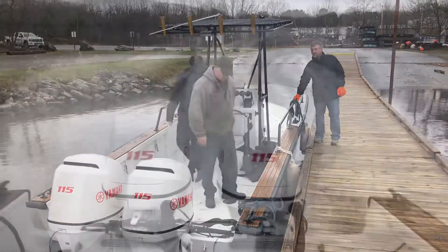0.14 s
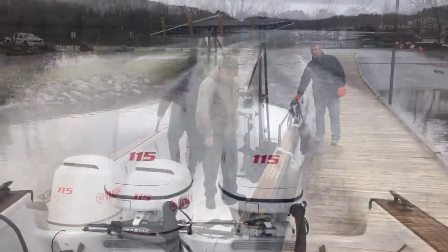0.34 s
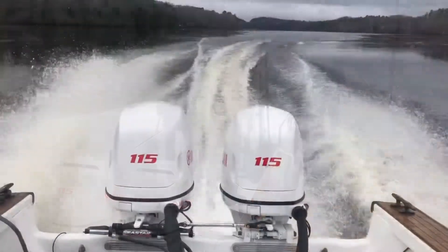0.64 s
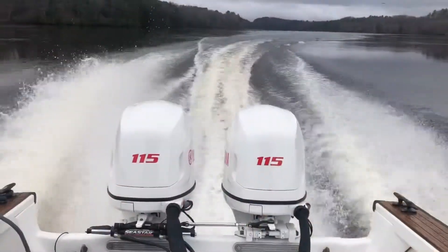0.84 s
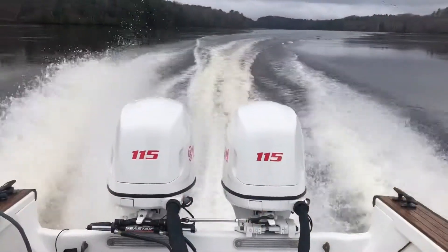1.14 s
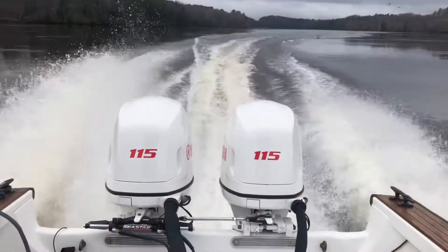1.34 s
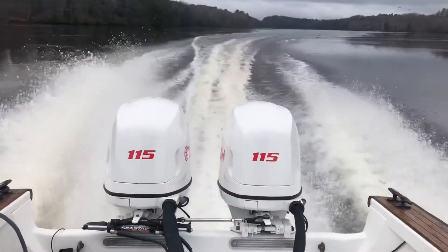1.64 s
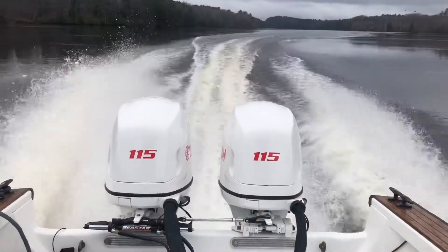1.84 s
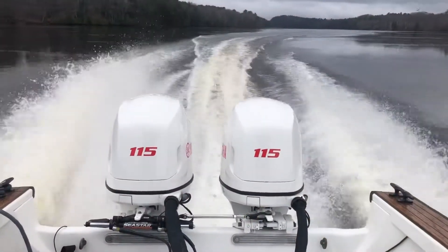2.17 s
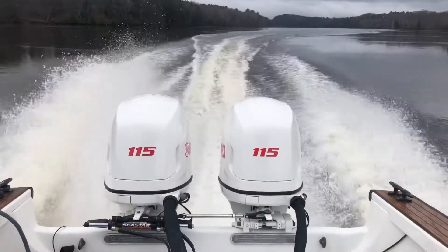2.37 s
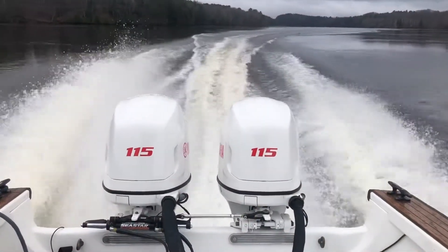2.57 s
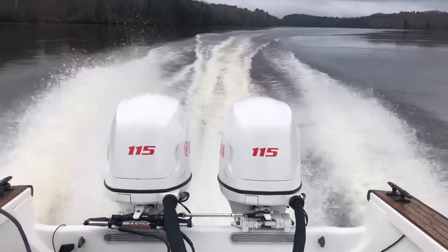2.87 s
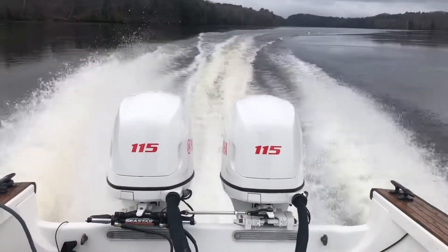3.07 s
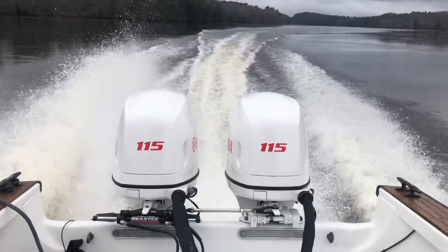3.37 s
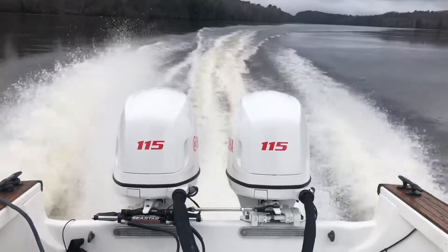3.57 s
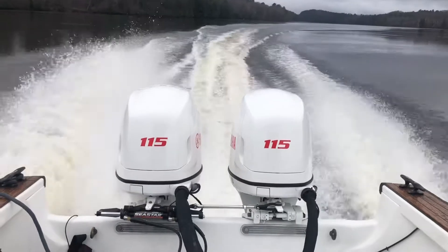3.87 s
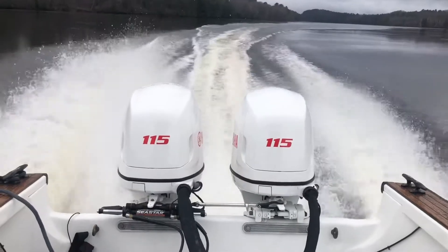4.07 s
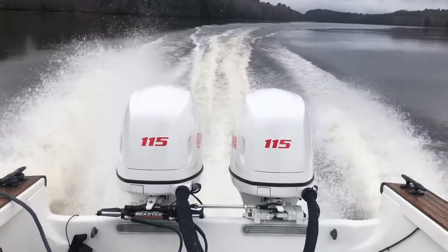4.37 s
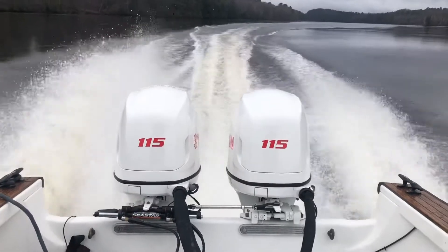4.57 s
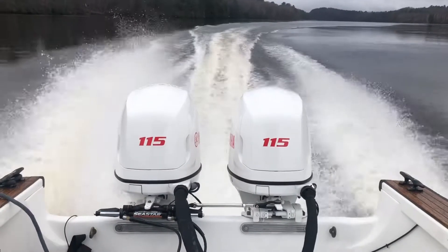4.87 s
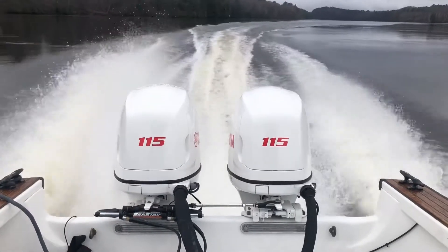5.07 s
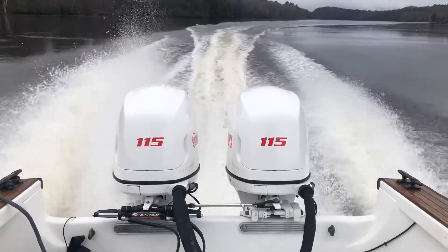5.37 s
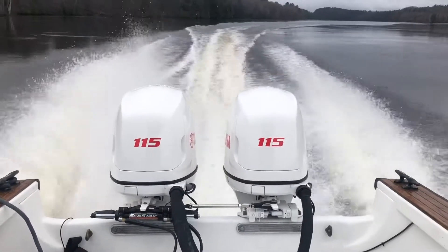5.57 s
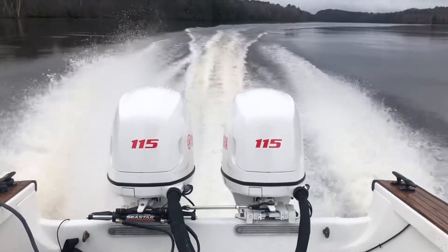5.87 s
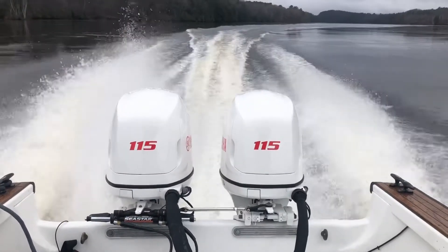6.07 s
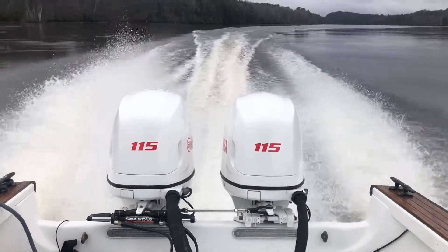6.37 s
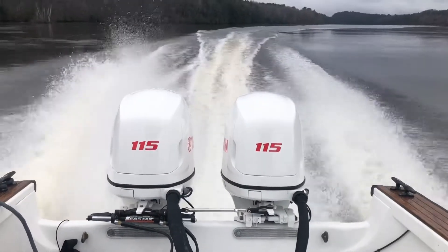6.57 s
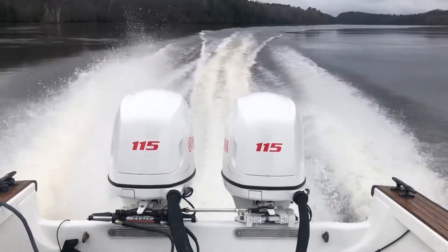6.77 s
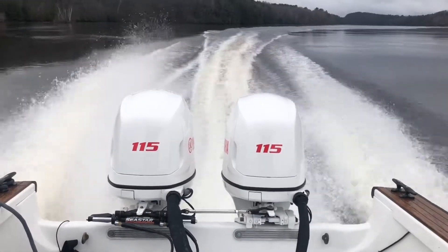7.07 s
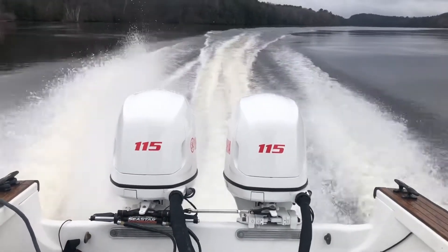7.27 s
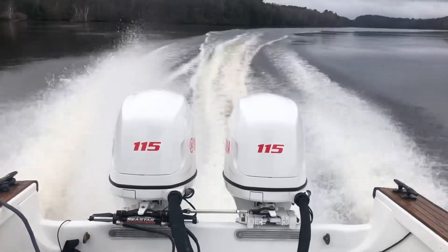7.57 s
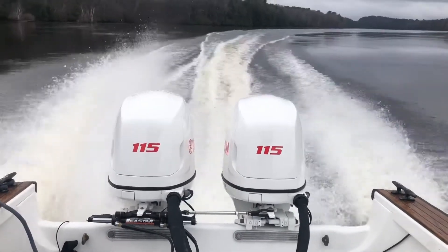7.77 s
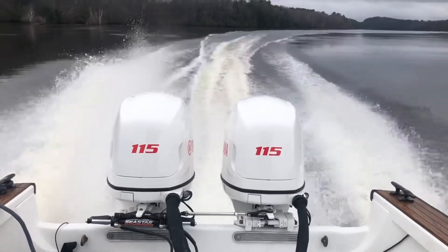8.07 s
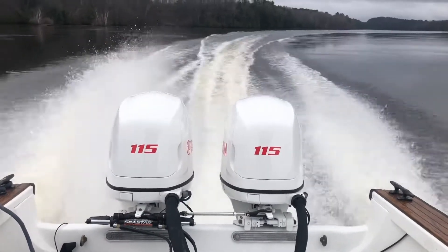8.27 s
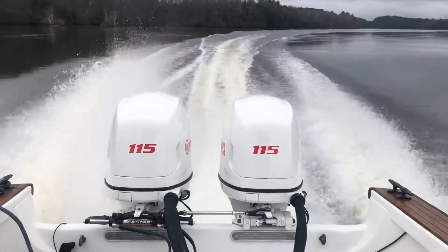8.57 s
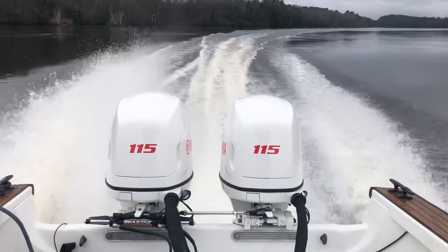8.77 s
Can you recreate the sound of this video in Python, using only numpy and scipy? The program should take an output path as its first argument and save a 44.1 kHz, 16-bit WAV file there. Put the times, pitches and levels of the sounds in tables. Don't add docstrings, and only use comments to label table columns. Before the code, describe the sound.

A speedboat's two outboards hold a loud, slowly beating drone with buzzing cowls, over rushing wake hiss and irregular crackling wind thuds.

```python
import sys
import numpy as np
from scipy import signal
from scipy.fft import rfft, irfft, next_fast_len
from scipy.io import wavfile
from scipy.ndimage import uniform_filter1d

SR = 44100
rng = np.random.default_rng(int(sys.argv[2]) if len(sys.argv) > 2 else 0)


def digitize_waveform(pressure):
    field = np.atleast_2d(pressure).T
    bounded = np.clip(field, -1, 1)
    quanta = np.round(bounded * 32767).astype(np.int16)
    wavfile.write(sys.argv[1], SR, quanta)


def nominal_scale(level):
    x = np.asarray(level, float) / 20
    return 10 ** x


N = 393813


def rms_one(x):
    return x / np.sqrt(np.mean(x ** 2) + 1e-20)


def in_time(rows):
    seconds, *columns = np.transpose(rows)
    return [np.interp(np.arange(N) / SR, seconds, column) for column in columns]


def drift(rate, size=1):
    pole = np.exp(-80 * np.pi * rate / SR)
    noise = rng.standard_normal(N // 40 + 2002)
    slow = signal.lfilter([1], [1, -2 * pole, pole * pole], noise)[2000:]
    return np.interp(np.arange(0, N, size) / 40, np.arange(len(slow)), rms_one(slow))


def coloured(x, spectrum, patchy_db=0, count=1):
    size = next_fast_len(N)
    hz, level_db = np.transpose(spectrum)
    pitch = np.log(np.maximum(np.arange(size // 2 + 1), 1) * SR / size)
    shaped = rfft(x, size) * nominal_scale(np.interp(pitch, np.log(hz), level_db, left=-90, right=-90))
    place = np.interp(pitch, np.log(hz[[0, -1]]), [0, count - 1])
    together = 0.21 * drift(3.6) + 0.5 * drift(0.53)
    total = 0
    for k in range(count):
        band = irfft(shaped * np.clip(1 - abs(place - k), 0, 1), size)[:N]
        total = total + band * nominal_scale(patchy_db * (together + drift(9.7)))
    return rms_one(total)


# time in seconds, level in dB.
OPENING_RISE = [
    (0, -12.5),
    (.15, -10),
    (.3, -6.5),
    (.5, -4),
    (.65, -2),
]


def opening():
    return nominal_scale(in_time(OPENING_RISE)[0])


# frequency in Hz, level in dB per Hz.
RUMBLE_SPECTRUM = [(28, -48), (42, -9.5), (70, -5), (150, -4), (260, -5.5), (450, -18), (900, -24)]
CRACKLE_SPECTRUM = [(120, -27), (220, 1.5), (350, 1), (550, 1), (900, -9), (1500, -17.5), (3000, -28.5)]
THUD_SPECTRUM = [(38, -40), (58, -0.5), (90, -3), (160, 3.5), (260, -1), (400, -37)]
# start in seconds, peak level in dB, thud level in dB relative to the crackle.
STRONG_BUFFETS = [(.897, -13, -8), (1.01, -13, -15), (1.064, -15, -19), (1.313, -10, -10),
                  (1.438, -16.5, -22), (1.537, -12.5, -14), (1.914, -22, -18), (2.272, -32, -17),
                  (2.384, -14, -25), (2.426, -13, -12), (3.162, -8.5, -9), (3.308, -16, -10),
                  (4.156, -15.5, -10), (4.24, -14.5, -14), (4.888, -13.5, -12), (4.929, -18, -14),
                  (5.262, -15, -1), (5.535, -15.5, -8), (5.618, -16, -11), (6.009, -25, 2),
                  (6.282, -14, -3), (6.81, -12.5, -8), (6.975, -10.5, -7), (7.312, -12.5, -12),
                  (7.395, -13.5, -8), (7.505, -10, -6.5), (7.604, -13, -14), (8.242, -13, -6),
                  (8.482, -17, -18), (8.703, -9.5, -13)]


def wind():
    small = []
    for when, size in rng.uniform(0.02, 1, (36, 2)):
        small.append((0.3 + when * (N / SR - 0.4), -23 + 2.5 * np.log(size), -7))
    crackle_s, thud_s = 0.035, 1.95 * 0.035
    gusts = np.zeros((2, N))
    for s, peak_db, thud_db in [*STRONG_BUFFETS, *small]:
        start = int(s * SR)
        levels_db = (peak_db - 5.0, peak_db + thud_db + 1.0)
        for gust, level_db, span in zip(gusts, levels_db, (crackle_s, thud_s)):
            age = np.arange(int(5 * span * SR)) / (span * SR / 3)
            gust[start:start + len(age)] += (nominal_scale(level_db) * age * np.exp(1 - age))[:N - start]
    swell = 1 + nominal_scale(12) * uniform_filter1d(gusts[1], size=int(0.18 * SR))
    rumble_gain = nominal_scale(-29.5 + 4.0 * drift(4.1)) * swell
    rumble = rumble_gain * coloured(rng.standard_normal(N), RUMBLE_SPECTRUM, patchy_db=5.0, count=3)
    crackle = coloured(rng.standard_normal(N) * nominal_scale(3 * drift(120)), CRACKLE_SPECTRUM)
    crackle = crackle / np.sqrt(uniform_filter1d(crackle ** 2, size=SR // 30))
    thud = coloured(rng.standard_normal(N), THUD_SPECTRUM)
    return opening() * rumble + gusts[0] * crackle + gusts[1] * thud


# time in seconds, level in dB above cruise.
ENGINE_LOAD = [(.7, 5), (1.0, 4), (1.45, 4.5), (1.95, 3.5), (2.45, 4), (3.05, 2), (3.25, 3), (3.65, 1),
               (4.5, 0.9), (5.7, 1.5), (6.5, -0.16), (7.3, 0.5), (8.2, 0), (8.93, 0.5)]


def load():
    return in_time(ENGINE_LOAD)[0]


INTAKE_FOLLOWS = 1.36


def whistle():
    edge = signal.butter(2, [6415, 6455], "band", fs=SR, output="sos")
    tone = rms_one(signal.sosfilt(edge, rng.standard_normal(N)))
    return nominal_scale(INTAKE_FOLLOWS * load() - 45.0) * tone


# frequency in Hz, level in dB per Hz.
ROAR_SPECTRUM = [(120, -9.5), (200, -8), (237, -14.5), (284, -11), (332, -15), (384, -15), (639, -19),
                 (963, -17), (1040, -17.5), (1270, -19), (1440, -19.5), (3600, -38.5), (4680, -45),
                 (7920, -120)]
SPRAY_SPECTRUM = [(1800, -6), (3000, -0.5), (4300, 4.5), (5300, 6), (7100, 6), (8300, 4.5), (9050, 0),
                  (11000, -.5), (13600, -0.2), (16500, -2.5)]
INTAKE_SPECTRUM = [(4800, -16), (5500, -6.5), (5900, 3), (6400, 2), (6900, -3), (7600, -29)]


def rush(turns):
    load_db = load()
    throb = 1 + sum(0.067 * np.cos(2 * np.pi * c) + 0.2 * np.cos(4 * np.pi * c) for c in turns)
    roar = throb * coloured(rng.standard_normal(N), ROAR_SPECTRUM, patchy_db=1.0, count=6)
    spray = coloured(rng.standard_normal(N), SPRAY_SPECTRUM, patchy_db=0.88, count=5)
    intake = coloured(rng.standard_normal(N), INTAKE_SPECTRUM, patchy_db=1.6, count=3)
    roar_gain = nominal_scale(-24 + load_db)
    spray_gain = nominal_scale(-32 + 0.92 * load_db)
    intake_gain = nominal_scale(-36 + INTAKE_FOLLOWS * load_db)
    return roar_gain * roar + spray_gain * spray + intake_gain * intake


# order of the cycle, level in dB above its neighbours.
CLATTER_RESONANCES = [(40, 4.5), (45, 8.5), (52, 7.5), (59, 5), (61, -9)]


def valve_gear(turns):
    order, angle = np.arange(37, 76)[:, None], np.linspace(0, 1, 2049)
    level_db = -0.5 * (order - 37) + rng.normal(0, 1.5, order.shape)
    level_db += sum(lift_db * (order == round(k)) for k, lift_db in CLATTER_RESONANCES)
    partials = nominal_scale(level_db) * np.sin(2 * np.pi * (order * angle + rng.random(order.shape)))
    shape = np.sum(partials, axis=0)
    far, near = (np.interp(c % 1, angle, shape) for c in turns)
    return nominal_scale(load() - 44.5 + drift(15)) * (near + 0.47 * far)


# order, near motor's rms level in dB midway,
# far motor's level in dB above it, slope in dB per second as the speed climbs through cowl resonances.
COWL_ORDERS = [(5.61, -38.5, -9, 1), (6, -32.5, -5.5, -0.1), (7, -46.5, -1.5, -2), (8, -36.5, 6.5, -1.28),
               (9, -48, 2.5, 0.3), (12, -37, -11.5, -2), (14, -49.5, 3, 0.5), (15, -47, 4.5, -2),
               (16, -46.5, 3, 0.9), (17, -39.5, 2, -0.15), (18, -46.5, 10.5, -0.05), (19, -43.5, 7.5, -0.9),
               (20, -32.5, 3, -1), (21, -36.5, 0.5, -0.6), (22, -38, -17, -1), (23, -38.5, 4, -0.1),
               (24, -41.5, 0.5, -2.2), (25, -42, 4, -0.7), (26, -37, -9, 0.94), (27, -34.5, -5, -1.5),
               (28, -39, -4, -0.5), (29, -50.5, 1.5, 1.4), (30, -47, 6, 0), (31, -54, -20, -6),
               (32, -38.5, -6, -0.35), (33, -48.5, 2, -2), (34, -49.5, -1, -1), (35, -41, -8, 0),
               (36, -45, 3, -.5)]


def cowl(turns):
    far_turns, near_turns = (c[::8] for c in turns)
    since_midway = np.arange(0, N, 8) / SR - 4.1
    out = 0
    for order, midway_db, far_db, db_per_s in COWL_ORDERS:
        order = order if order < 5.8 else round(order)
        level_db = midway_db + db_per_s * since_midway + 1.6 * drift(6, size=8)
        start = rng.normal(0, 0.16)
        near = np.sin(2 * np.pi * (order * near_turns + start))
        far = -np.cos(2 * np.pi * (order * far_turns + start + 0.018 * drift(1, size=8)))
        out = out + nominal_scale(level_db + 4.5) * (near + nominal_scale(far_db) * far)
    return signal.resample_poly(out, 8, 1)[:N]


# time in seconds, rate in Hz.
FIRING_RATE = [(0, 182.2), (0.3, 183.1), (1.2, 184.3), (1.7, 186.2), (2.5, 187.4), (3.3, 189.2), (4.3, 190),
               (5.5, 191.4), (6.4, 191.6), (6.8, 191.3), (7.7, 191.6), (8.3, 192.5), (8.93, 192.6)]
# time in seconds, weaker motor's level in dB relative to the stronger.
BEAT_MINIMA = [(-.15, -1.5), (.66, -1), (1.49, -1.3), (2.22, -.8), (3.05, -2.5), (3.96, -3), (4.97, -1.2),
               (6.15, -3), (6.98, -2.5), (8.03, -.8), (9.1, -2)]


def cycles():
    mean = np.cumsum(in_time(FIRING_RATE)[0]) / SR / 4 + 0.005 * drift(1.2)
    slip = in_time([(s, k + 0.5) for k, (s, weak_db) in enumerate(BEAT_MINIMA)])[0] / 8
    return [mean + side * slip + 0.002 * drift(8) for side in (1, -1)]


# time in seconds, rms level in dB.
DRONE_LEVEL = [(0, -12.5), (.8, -10.5), (1.4, -12), (1.85, -10.5), (2.1, -14), (2.35, -9), (2.65, -11.5),
               (3.2, -7), (3.5, -11), (4.0, -8.5), (4.7, -14), (5.5, -11.5), (6.3, -11), (6.55, -11.5),
               (6.95, -8), (7.6, -13.5), (8.2, -12), (8.93, -11.5)]


def firing(turns):
    one, other = (nominal_scale(0.4 * drift(6)) * np.sin(8 * np.pi * c) for c in turns)
    weaker = nominal_scale(in_time(BEAT_MINIMA)[0])
    return np.sqrt(2) * nominal_scale(in_time(DRONE_LEVEL)[0]) * (one + weaker * other)


def scene():
    turns = cycles()
    boat = firing(turns) + cowl(turns) + valve_gear(turns) + rush(turns) + whistle()
    return (opening() * boat + wind())[None]


def roll_off(x):
    return signal.sosfilt(signal.butter(12, 16480, fs=SR, output="sos"), x)


def record(dry):
    over_db = np.maximum(20 * np.log10(abs(dry[0]) + 1e-9) + 0.1, 0)
    ramp = 120 * np.arange(N) / SR
    held_db = np.maximum.accumulate(over_db + ramp) - ramp
    duck_db = uniform_filter1d(np.roll(held_db, -40), size=81)
    limited = np.clip(dry * nominal_scale(-duck_db), -1, 1)
    top = signal.ellip(14, 0.5, 80, 15730, fs=SR, output="sos")
    mix = signal.sosfilt(top, limited)
    return roll_off(mix)


dry = scene()
out = record(dry)
digitize_waveform(out)
```